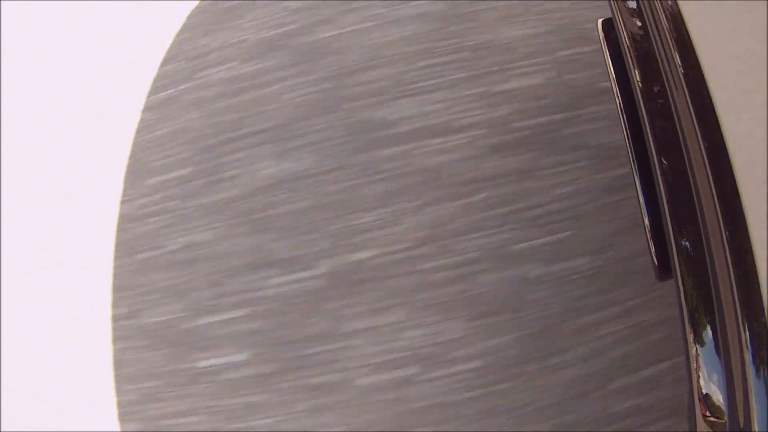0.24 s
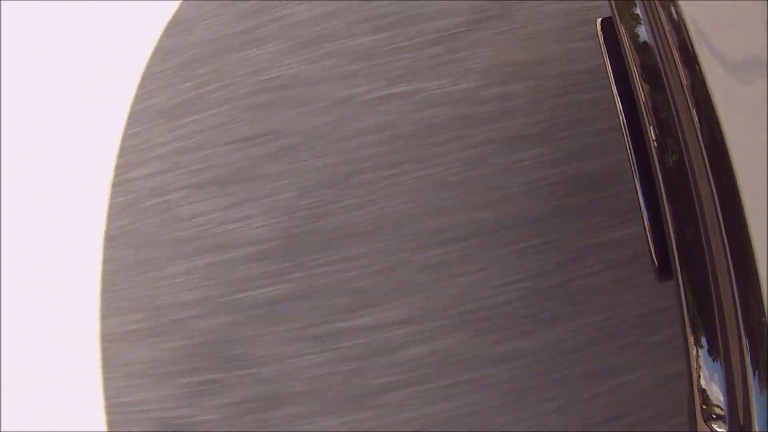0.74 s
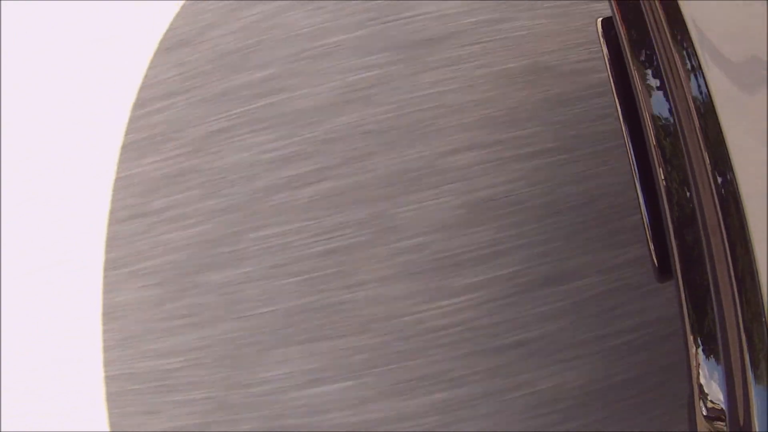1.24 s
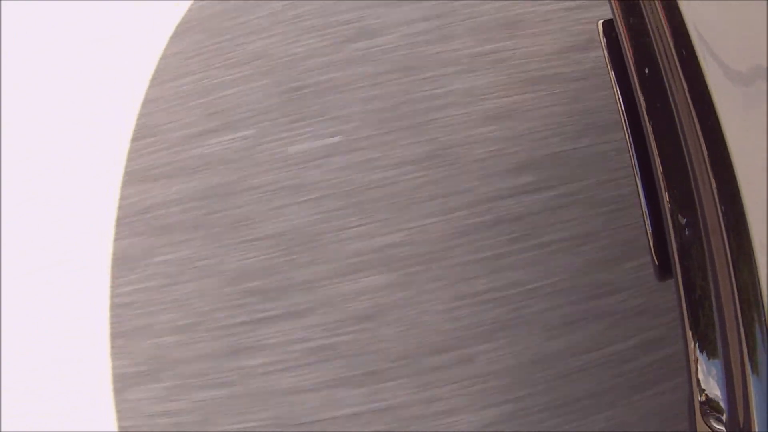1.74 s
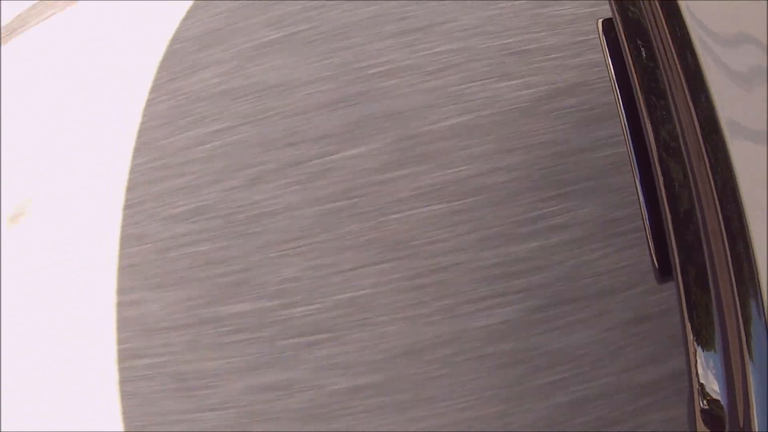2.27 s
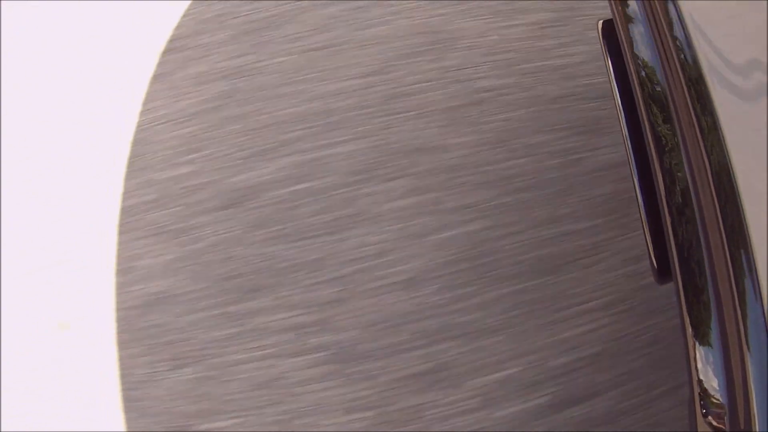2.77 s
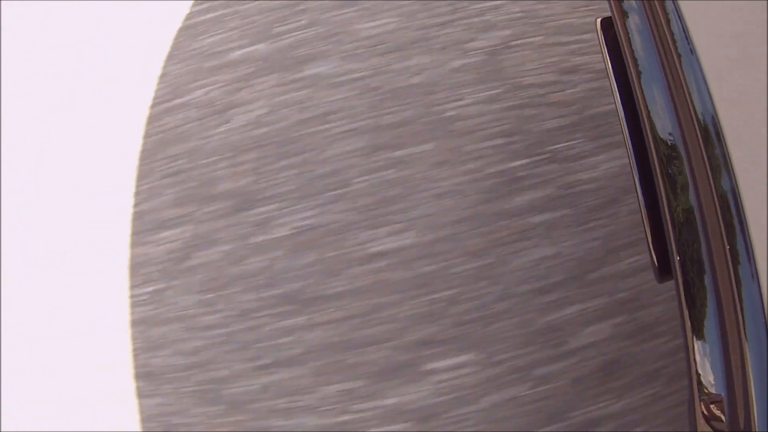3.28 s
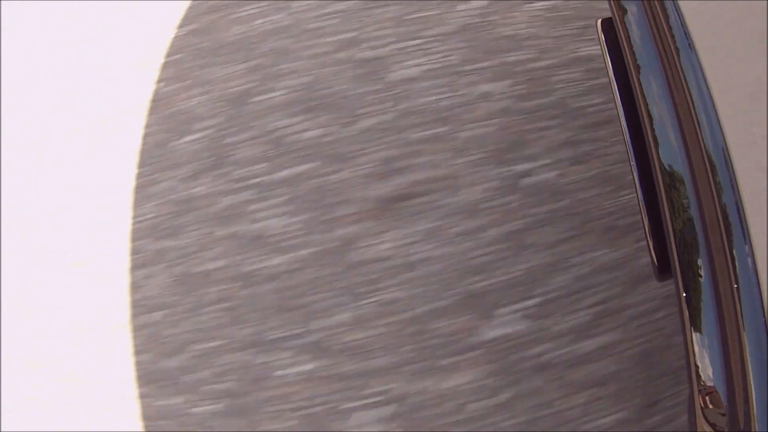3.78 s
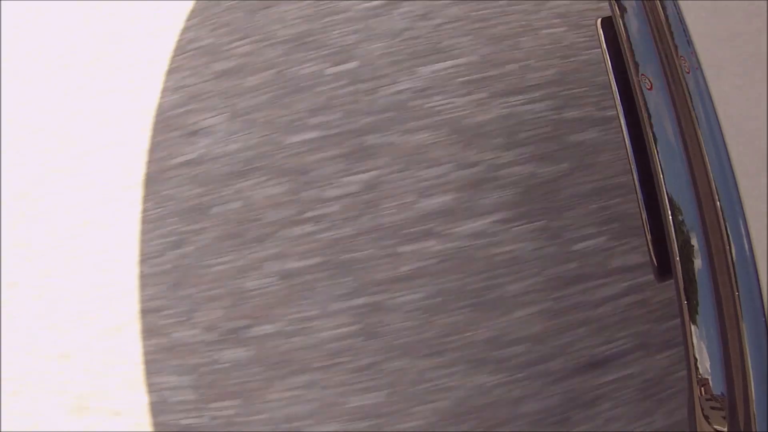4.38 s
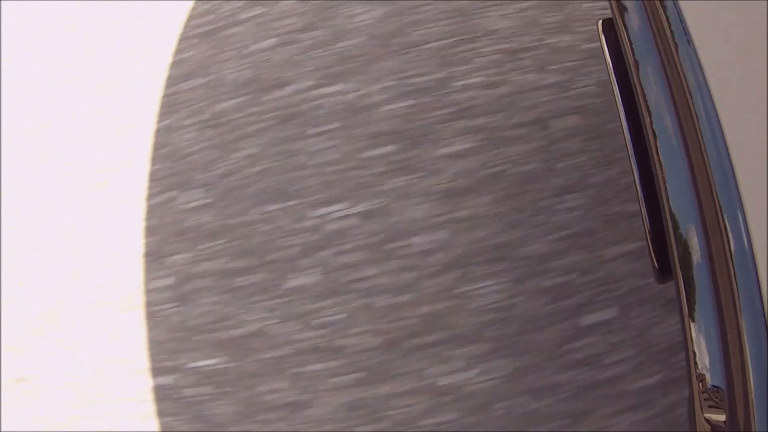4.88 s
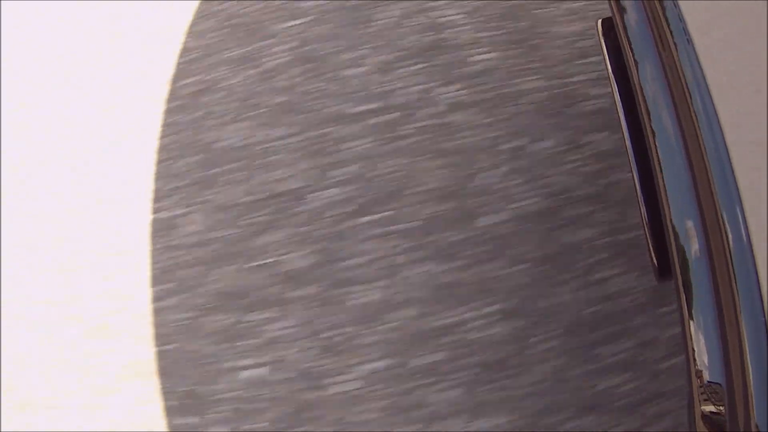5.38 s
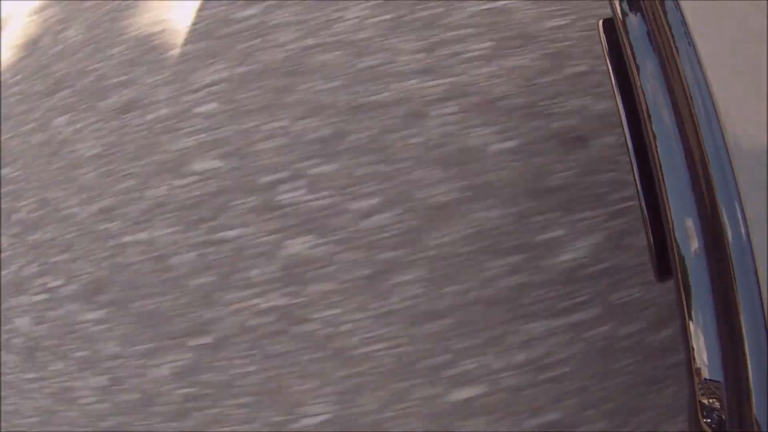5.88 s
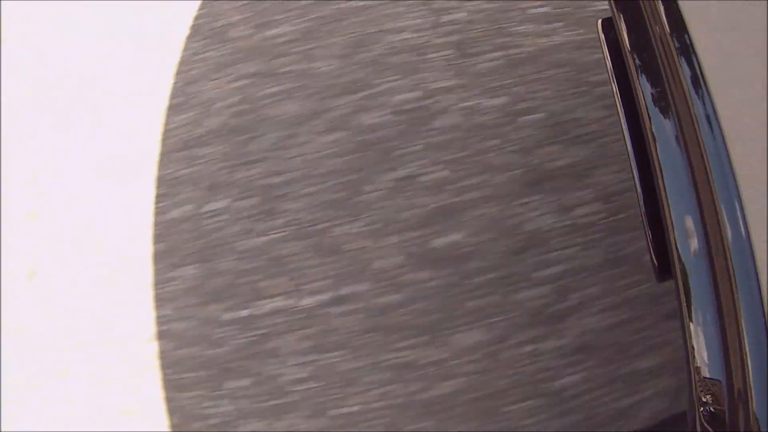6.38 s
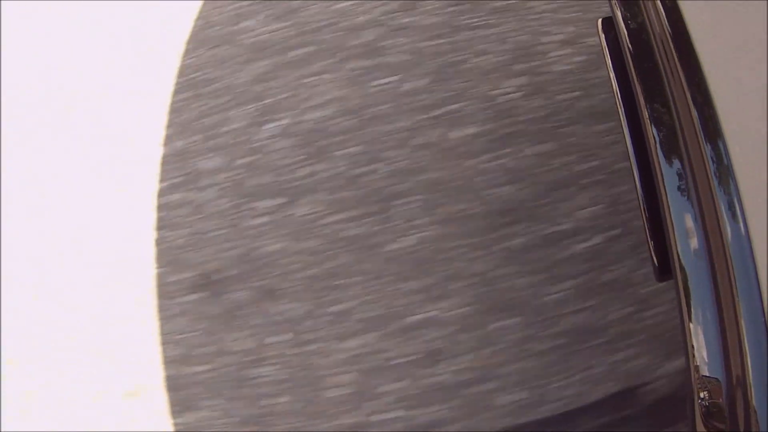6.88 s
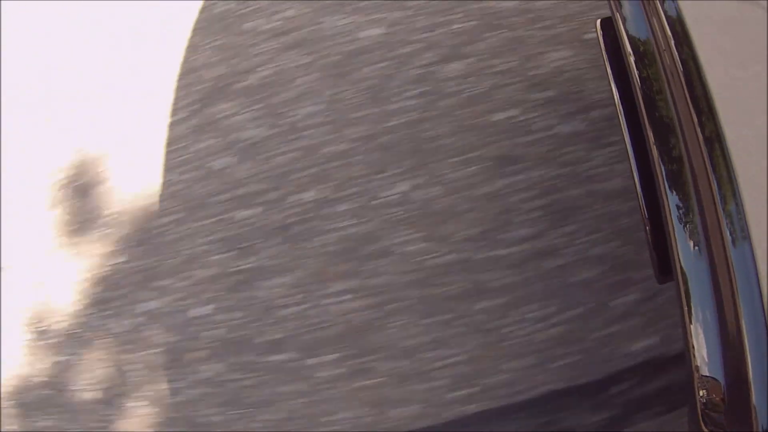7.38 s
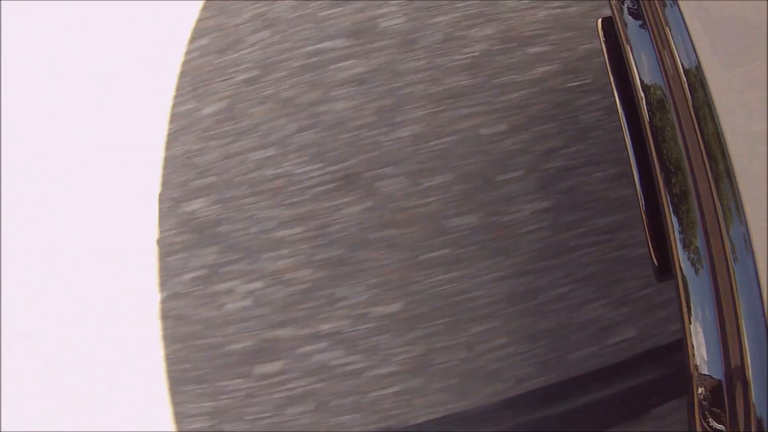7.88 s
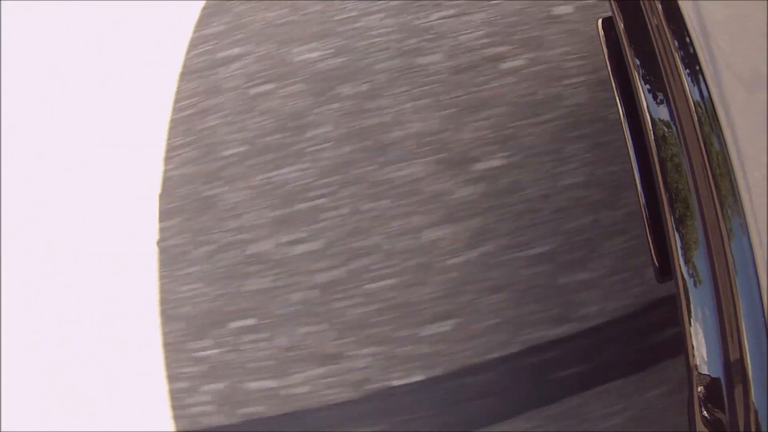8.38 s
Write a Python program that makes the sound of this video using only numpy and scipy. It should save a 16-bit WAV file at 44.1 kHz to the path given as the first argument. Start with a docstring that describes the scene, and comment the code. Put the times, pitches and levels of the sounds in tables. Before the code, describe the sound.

Close at a driving car's tailpipe: throaty warbling engine pull, crackling coast, quick downshift rev, sharp bangs, then a slowly falling coarse growl.

```python
"""Five-cylinder turbo exhaust

A boxed microphone on the rear bumper hears the engine pull, burble, coast, blip, backfire and slow down.
Firing pulses and gated gas noise ring the open tailpipe, over clean firing tones and a low lope.
Filtered noise and gliding sines make the turbo; impulses and noise bursts make the bangs and treble ticks.
The loudest peaks overload and flatten at full scale."""
import sys
import numpy as np
from scipy import signal
from scipy.fft import irfft
from scipy.io import wavfile
from scipy.ndimage import uniform_filter1d

SR = 44100
rng = np.random.default_rng(int(sys.argv[2]) if len(sys.argv) > 2 else 0)


def persist_wave(psi):
    """Save psi, clipped to +-1, as 16-bit WAV."""
    counts = np.round(np.clip(psi, -1, 1) * 32767).astype(np.int16)
    wavfile.write(sys.argv[1], SR, np.atleast_2d(counts).T)


N = 380583
HZ = np.fft.rfftfreq(8192, 1 / SR)  # frequency grid of the filters


def amp(db):
    """Decibel law: converts a level to an amplitude gain."""
    return 10 ** (np.asarray(db) / 20)


def evened(x):
    """Power normalisation: scales the whole signal to rms 1."""
    return x / np.sqrt(np.mean(x ** 2) + 1e-20)


def steady(x, span=SR // 4):
    """Running power normalisation: brings the moving rms to 1."""
    return x / np.sqrt(abs(uniform_filter1d(x ** 2, size=span)) + 1e-20)


def drift(span):
    """Low-pass random process: noise averaged twice over span samples, at rms 1."""
    once = uniform_filter1d(rng.standard_normal(N), size=span)
    return evened(uniform_filter1d(once, size=span))


def decaying(x, decay_s):
    """Exponential relaxation: each impulse dies away with time constant decay_s."""
    return signal.lfilter([1], [1, -np.exp(-1 / (decay_s * SR))], x)


def along(table):
    """Linear interpolation in time: each column of a table as a curve over all samples."""
    s, *columns = np.transpose(table)
    return [np.interp(np.arange(N) / SR, s, c) for c in columns]


def read(points, hz):
    """Spectral interpolation: straight lines on a log-frequency axis."""
    f, value = np.transpose(points)
    return np.interp(np.log(hz + 1), np.log(f + 1), value)


def joined(db, gain):
    """Power addition: level in dB of two unrelated sounds together."""
    return 10 * np.log10(amp(db) ** 2 + gain ** 2)


def modes(table, top_hz):
    """Modal summation: gain of steep resonances in power; the box shuts out what lies above top_hz."""
    rings = sum(amp(2 * db) / (1 + (2 * (HZ - hz) / width) ** 2) ** 1.488 for hz, width, db in table)
    return np.sqrt(rings / (1 + (HZ / top_hz) ** 16))


def lifts(table):
    """Resonant equalisation: gain over HZ of peaks or dips."""
    return amp(sum(db / (1 + (2 * (HZ - hz) / width) ** 2) for hz, width, db in table))


def colour(x, gain):
    """Minimum-phase filtering: a causal filter shaped as gain; a click comes out with peak 1."""
    log = np.log(np.maximum(gain / gain.max(), 1e-5))
    mirrored = np.concatenate([log, log[-2:0:-1]])
    phase = -signal.hilbert(mirrored).imag[:len(log)]
    taps = irfft(np.exp(log + 1j * phase))[:4096]
    return signal.oaconvolve(np.ravel(x), taps / abs(taps).max())[:N].reshape(np.shape(x))


def resonate(x, hz, width):
    """Heterodyne resonance along the curve hz: filtered both ways, it swells as slowly as it dies."""
    turn = np.exp(2j * np.pi * np.cumsum(hz) / SR)
    r = np.exp(-np.pi * width / SR)
    return (turn * signal.filtfilt([1 - r], [1, -r], x / turn)).real


# round trips in the tailpipe: delay_s, level_db
PIPE_ECHOES = [(.0072, -16.5), (.0145, -19.5)]


def echoed(x):
    """Pipe reflection: each pulse runs up the pipe and back."""
    return x + sum(amp(db) * np.roll(x, round(s * SR)) for s, db in PIPE_ECHOES)


# what the driver does, each row until the next; the engine's resonances then shape the levels:
# start_s, firing_tone_db, pipe_boom_db, lope_db, upper_tones_db, load (0-1)
PHASES = [(0, -30.5, -55, -26.5, -34.5, 0.27), (0.152, -27.5, -33, -27.5, -32, 1),
          (1.38, -29, -44, -24, -40.5, 0.45), (2.58, -34.5, -32, -29, -48, 0),
          (3.144, -23, -28, -27.5, -33, 0.5), (3.678, -28, -40, -27.5, -28, 0.57),
          (4.289, -34.5, -28.5, -29, -32, 0.6), (4.617, -48.5, -47, -24.5, -55, 0.4),
          (5.192, -38, -58, -20, -31.5, 0.3), (5.951, -37, -44, -16.5, -35, 0.1),
          (7.447, -19.5, -21, -25, -35, 0.16)]
# loose burns in each phase: share (0-1)
MISFIRE = [.1, .06, .62, .35, .04, .11, .04, .62, .15, .2, .06]
FUEL_CUT_S = PHASES[7][0]
CHANGE_S = 0.0075  # from one phase to the next


def phases():
    """Smoothed step control: each phase column and the misfire share, with soft edges."""
    start, *columns = np.transpose(PHASES)
    now = np.maximum(np.searchsorted(start, np.arange(N) / SR, "right") - 1, 0)
    steps = [c[now] for c in (*columns, np.array(MISFIRE))]
    return [uniform_filter1d(step, size=round(CHANGE_S * SR), mode="nearest") for step in steps]


# clusters of late burns that shake the silencer, before its resonance acts: start_s, length_s, lope_db
BURBLES = [(1.436, 0.26, -11), (1.952, 0.037, -7), (2.025, 0.11, -21.5), (2.287, 0.26, -11.5),
           (2.59, .53, -11.5), (3.669, 0.062, -17.5), (3.832, 0.1, -23), (4.089, 0.095, -22),
           (4.268, 0.024, -26), (4.634, 0.05, -15), (5.137, 0.023, -17)]
BURBLE_EDGE_S = .022  # rise and fall


def burbles():
    """Trapezoidal envelope: the gain of the burbles rises, holds and falls."""
    t = np.arange(N) / SR
    total = 0
    for s, length, db in BURBLES:
        inside = np.minimum(t - s, s + length - t)
        total = total + amp(db) * np.clip(inside / BURBLE_EDGE_S + .5, 0, 1)
    return total


# each cylinder's pulse at the tailpipe, strength before a lopsided engine widens it:
# strength_db, manifold_delay_s
CYLINDERS = [(0, 0), (-2.5, .00029), (-1.5, .00086), (-3, .00029), (-2, 0)]
WANDER_S, LATE_S = .00016, .00077  # slow timing drift of each cylinder; scatter of fully loose burns


def firings(turns, misfire, lopsided):
    """Cyclic combustion: five pulses a cycle, of cylinder strength and chance strength, and charge noise."""
    fired = np.flatnonzero(np.diff((5 * turns).astype(int)))[:-1]
    count = np.arange(len(fired))
    cylinder_db, delay = np.transpose(CYLINDERS)[:, (count + 1) % 5]
    strength, charge, scatter = rng.standard_normal((len(fired), 3)).T
    loose = misfire[fired]
    # each cylinder reads its own stretch of one drift
    wander = WANDER_S * (2 + drift(5000)[(fired + count % 5 * (N // 5)) % N])
    late = delay + wander + LATE_S * loose * scatter
    pulse_db = (1 + 1.6 * lopsided[fired]) * cylinder_db + (.7 + 7 * loose) * np.minimum(strength, .8)
    pulses, uneven = np.zeros((2, N))
    pulses[fired + np.round(late * SR).astype(int)] = amp(pulse_db)
    uneven[fired] = np.tanh(2 * charge)  # a charge burns or does not
    return pulses, uneven


# relative ring of tailpipe and microphone box: pitch_hz, width_hz, level_db
PIPE_RINGS = [(275, 130, -5.5), (329.7, 15, 8), (447, 69, -4), (528, 190, -11), (659.3, 86, 6.5),
              (808, 23, 2.5), (851, 69, -6.5)]
PIPE_HZ, PIPE_WIDTH_HZ, BOOM_LIFT_DB = 337, 6.7, 9  # the boom swells as it nears the pipe resonance
UPPER_FLOOR_DB = -26.5  # upper tones between the rings


def drone(hz, turns, tone_db, boom_db, upper_db):
    """Harmonic series of five like pulses a cycle: clean tones, with the pipe boom on the third."""
    boom_db = boom_db + BOOM_LIFT_DB / (1 + ((15 * hz - PIPE_HZ) / PIPE_WIDTH_HZ) ** 2)
    # the second tone swells as it crosses the pipe resonance
    passing_db = 9 / (1 + ((10 * hz - PIPE_HZ) / 24) ** 2)
    rings_db = 20 * np.log10(modes(PIPE_RINGS, top_hz=1500) + amp(UPPER_FLOOR_DB))
    upper = [upper_db + np.interp(5 * k * hz, HZ, rings_db) for k in range(4, 9)]
    out = 0
    for k, db in enumerate([tone_db, tone_db - 11.0 + passing_db, boom_db] + upper, start=1):
        out = out + np.sqrt(2) * amp(db + 2.2 * drift(2000)) * np.sin(2 * np.pi * 5 * k * turns)
    return out


# unequal cylinders sound between the firing orders, relative levels: multiple_of_cycle, level_db
LOPE_ORDERS = [(1, -20), (2, -7), (3, -10), (4, -19), (6, -22.5), (8, -23.5)]


def lope(turns, uneven, misfire):
    """Subharmonic orders of unequal cylinders; misfires turn them into loose booms in the silencer."""
    tones = 0
    for k, db in LOPE_ORDERS:
        angle = 2 * np.pi * k * (turns - .12) + .3 * k ** 2
        tones = tones - amp(db + 0.31 * drift(3000)) * np.cos(angle)
    booms = colour(uneven, modes([(47.5, 78, -8.0), (82, 380, -18.0)], top_hz=403))
    return np.sqrt(1 - misfire ** 2) * evened(tones) + misfire * steady(booms, span=SR // 16)


# the main ring wanders as the gas heats and cools: time_s, pitch_hz
MAIN_RING = [(0, 693), (1.5, 690), (2.5, 655), (3.8, 670), (4, 745), (4.08, 680), (5.3, 660), (6.1, 700),
             (7.4, 722), (7.6, 670), (8.63, 680)]
MAIN_WIDTH_HZ, MAIN_TAKES = 120, .7  # MAIN_TAKES: share of the sharp rasp that lazy burns replace


def rasp(pulses, misfire, lopsided, boost_db):
    """Impulse excitation of pipe modes: firing pulses and the gas puffs behind them ring the tailpipe."""
    puff = evened(decaying(pulses, 0.009))
    gas = (.13 + misfire) * evened((puff + .3) * rng.standard_normal(N))
    drive = echoed(gas + evened(pulses))
    sharp = steady(colour(drive, modes(PIPE_RINGS, top_hz=1230)))
    # slow lazy burns swell in the main ring alone
    soft = steady(resonate(drive, along(MAIN_RING)[0], MAIN_WIDTH_HZ))
    lazy = lopsided * (1 - 0.63 * misfire) * soft
    return steady((1 - MAIN_TAKES * lopsided) * sharp + lazy + amp(boost_db) * soft)


# relative spectrum of the gas hiss: pitch_hz, density_db per Hz
HISS_SPECTRUM = [(590, 0), (1000, -5), (1070, -8.5), (1180, 0), (1320, -12.5), (1620, -10.5), (1890, -12.5),
                 (2210, -15), (2700, -19.5), (2860, -32), (3050, -21.5), (3160, -27), (3530, -30.5),
                 (4590, -66), (7770, -120)]
# rings in the hiss: pitch_hz, width_hz, loaded_lift_db, shut_throttle_lift_db
HISS_RINGS = [(1134, 11, 9.5, 11.5), (1529, 150, 13, 4.5), (1865, 110, 3, 10), (2038, 210, 6.5, 2.5),
              (2120, 69, 7, 0), (2360, 140, 11.5, -2), (2665, 150, 7, 7), (3460, 110, 14.5, -2.5),
              (2950, 39, 4, 10), (3580, 60, 7, 1)]


def hiss(pulses, spurt, load):
    """Turbulent flow noise: each firing spurts gas, and the hiss spectrum follows the load."""
    flow = (spurt + 5.1) * amp(1.7 * drift(600)) * rng.standard_normal(N)
    spectrum = amp(read(HISS_SPECTRUM, HZ))
    rings = np.array(HISS_RINGS)
    loaded = evened(colour(flow, spectrum * lifts(rings[:, [0, 1, 2]])))
    shut = evened(colour(flow, spectrum * lifts(rings[:, [0, 1, 3]])))
    plain = np.clip(load, 0, 1) * loaded + np.clip(1 - load, 0, 1) * shut
    # the pulse fronts carry above the rasp
    edges = colour(np.sqrt(pulses), modes([(1130, 4000, 0)], top_hz=2600))
    return steady(plain + 0.21 * evened(colour(edges, spectrum)))


# hard gas flow sets these rings fluttering, relative levels: pitch_hz, width_hz, level_db
BUZZ_RINGS = [(3147, 160, 5), (3420, 67, -1)]
BUZZ_DB, BUZZ_SLOPE, BUZZ_FROM_DB = -47, 2.45, -31  # level at a hiss of BUZZ_FROM_DB, dB per dB of hiss
BUZZ_STEADY = .6  # unpulsed part of the jets against the spurts
BOOST_DB = -44  # boost rings at a boost_db of 0


def buzz(spurt, hiss_db, boost_db):
    """Jet-driven resonance: fluttering gas excites narrow rings; high boost wakes two more."""
    flutter = amp(1.8 * drift(400))
    jets = (spurt + BUZZ_STEADY) * flutter * rng.standard_normal(N)
    flow_rings = steady(colour(jets, modes(BUZZ_RINGS, top_hz=3800)))
    boost_rings = steady(colour(jets, modes([(3300, 200, -5), (3710, 130, 0)], top_hz=3950)))
    flow_db = BUZZ_DB + BUZZ_SLOPE * (hiss_db - BUZZ_FROM_DB)
    return amp(flow_db) * flow_rings + amp(BOOST_DB + boost_db) * boost_rings


# engine speed: time_s, cycle_rate_hz
SPEED = [(0, 24.6), (.3, 24.75), (.5, 24.4), (.75, 24.85), (1.2, 25.3), (1.4, 25.25), (2.55, 23.55),
         (2.8, 23.2), (3.17, 22.85), (3.65, 22), (3.7, 22.4), (3.95, 30.1), (4.056, 33.8), (4.18, 35.1),
         (4.25, 35.45), (4.62, 35.15), (4.95, 33), (5.25, 32.8), (6.5, 27.93), (7, 26.22), (7.5, 24.6),
         (8, 22.92), (8.63, 20.8)]
# levels of the two noisy layers, the rasp before burbles add to it: time_s, rasp_db, hiss_db
GAS_LEVELS = [(0, -22.5, -38), (.1, -23.5, -35.5), (.2, -17.5, -31.5), (.4, -16, -30), (1.35, -16, -29),
              (1.45, -14.5, -31), (1.7, -21, -34.5), (1.9, -22, -35.5), (2.4, -19.5, -34),
              (3.15, -24, -36.5), (3.6, -14.5, -35), (3.7, -19.5, -36), (3.722, -17.5, -30.5),
              (3.93, -15, -28), (4.14, -16, -31), (4.26, -19.5, -33), (4.31, -23.5, -40), (4.4, -17, -35.5),
              (4.58, -16.5, -34.5), (4.72, -19, -31), (4.78, -30.5, -41.5), (4.92, -29.5, -42),
              (5.12, -25, -37), (5.2, -23, -33.5), (5.8, -22.5, -32), (6.6, -16.5, -29.5),
              (7.25, -20, -28.5), (7.455, -14, -29), (7.49, -15.5, -32.5), (8.63, -16.5, -36)]
# the lope fades as twice the cycle rate leaves the silencer resonance
SILENCER_HZ, SILENCER_WIDTH_HZ = 49.2, 5.66
BURBLE_RASP_DB = -9.5  # rasp against the lope of a burble
SPURT_S = .008  # decay of each gas spurt


def engine():
    """Source-filter principle: one cycle clock drives the tones, lope, rasp, hiss and buzz."""
    hz = along(SPEED)[0]
    turns = np.cumsum(hz) / SR - .1
    rasp_db, hiss_db = along(GAS_LEVELS)
    tone_db, boom_db, lope_db, upper_db, load, misfire = phases()
    boost_db = 1.3 * (along(TURBO_RUSH)[0] + 54)  # 0 dB at a rush of -54 dB

    burble = burbles()
    # near 1 burbles drive the silencer resonance; near 0 they only thump it
    near = 1 / (1 + ((2 * hz - SILENCER_HZ) / 12) ** 4)
    detuned = (2 * hz - SILENCER_HZ) / SILENCER_WIDTH_HZ
    lope_db = joined(lope_db - 10 * np.log10(1 + detuned ** 2), burble * amp(-10 * near))
    rasp_db = joined(rasp_db, burble * amp(BURBLE_RASP_DB))
    booming = np.clip(np.maximum(misfire, (1 - near) * burble / amp(lope_db)), 0, 1)

    lopsided = np.clip((lope_db - tone_db) / 15, 0, 1)  # a strong lope means one cylinder leads
    pulses, uneven = firings(turns, misfire, lopsided)
    spurt = steady(decaying(pulses ** 2, SPURT_S))  # the strongest firings spit most

    out = drone(hz, turns, tone_db, boom_db, upper_db)
    out = out + amp(lope_db) * lope(turns, uneven, booming)
    # burbles drive the silencer at twice the cycle rate
    out -= amp(-2.5) * near * burble * np.cos(4 * np.pi * (turns - .12) + 2.0)
    out += amp(rasp_db) * rasp(pulses, misfire, lopsided, boost_db)
    out += amp(hiss_db) * hiss(pulses, spurt, load)
    return out + buzz(spurt, hiss_db, boost_db)


# relative spectrum of rushing air: pitch_hz, density_db per Hz
AIR_SPECTRUM = [(3300, -24.5), (4000, -2), (4500, 1), (5500, -1.5), (6800, -6), (8000, -17), (11000, -31),
                (15000, -46)]
# rings in the rush: pitch_hz, width_hz, lift_db
AIR_RINGS = [(4470, 110, 6.5), (4900, 69, 2)]
# level of the rush: time_s, rush_db
TURBO_RUSH = [(0, -67.5), (0.18, -67), (0.6, -64.5), (1.35, -61.5), (1.7, -71.5), (2.42, -63),
              (2.72, -71.5), (3.55, -70), (3.66, -63.5), (3.8, -60.5), (3.95, -56), (4.1, -56.5),
              (4.26, -67), (4.92, -73.5), (6.4, -64), (7.41, -66), (7.55, -67.5), (8.6, -67.5)]
# faint whistles: start_s, end_s, start_hz, end_hz, level_db
WHISTLES = [(1.3, 2.898, 5770, 5020, -71), (5.65, 7.5, 8250, 6600, -85.5), (6.7, 8.6, 4520, 4460, -69),
            (.2, 1.8, 4900, 4520, -70)]


def turbo():
    """Broadband flow noise with tonal whistles: a smooth rush of air and thin wavering glides."""
    air = colour(rng.standard_normal(N), amp(read(AIR_SPECTRUM, HZ)) * lifts(AIR_RINGS))
    out = amp(along(TURBO_RUSH)[0] + 1.0 * drift(900)) * evened(air)
    t = np.arange(N) / SR
    for start, end, hz, end_hz, db in WHISTLES:
        glide = np.interp(t, [start, end], [hz, end_hz]) + .007 * hz * drift(300)
        fade = np.clip(np.minimum(t - start, end - t) / .2, 0, 1)
        out += fade * amp(db + 3 * drift(1500)) * np.sin(2 * np.pi * np.cumsum(glide) / SR)
    return out


# backfires in the pipe, impulse levels before the mix gains: start_s, impulse_db, crack_db
BANGS = [(.145, -10, -56), (1.486, -9, -28), (1.585, -1, -40), (1.744, -7.5, -60), (2.249, -1.5, -63),
         (2.327, -8, -44), (2.374, -6, -49), (2.657, -3.5, -40), (2.71, -9, -42), (2.743, -5.5, -44.5),
         (2.899, -14, -45), (2.933, -11, -36), (3.073, -24, -39), (3.117, -6.5, -37), (3.709, -4.5, -42),
         (3.769, -1, -30), (3.92, -4, -32), (4.005, -29, -38), (4.06, -2, -31), (4.114, -6, -22),
         (4.195, -6, -31), (4.7536, 0, -9), (4.828, 0.5, -13.5), (4.847, -15, -34), (4.871, -23, -45),
         (4.9599, -1, -10.5), (5.0678, -3, -16), (5.134, -9.5, -31)]
# relative spectrum of the crack: pitch_hz, density_db per Hz
CRACK_SPECTRUM = [(590, -16.5), (1000, -6.5), (1170, -8.5), (1490, -14.5), (1770, -10), (2230, -25),
                  (2750, -33.5), (3080, -30), (3530, -37), (4590, -84), (7770, -120)]


def bangs():
    """Impulse response of the tailpipe: a sudden pressure pulse rings it, with a short crack on top."""
    s, impulse_db, crack_db = np.transpose(BANGS)
    at = np.round(s * SR).astype(int)
    hard = s > FUEL_CUT_S  # then the bangs slam the pipe; earlier pops let it ring on
    ring, pop, crack = np.zeros((3, N))
    ring[at] = -amp(impulse_db) * hard
    pop[at] = -amp(impulse_db) * ~hard
    crack[at] = amp(crack_db)
    pop = colour(pop, modes([(676, 26, 8), (800, 120, -3)], top_hz=940))
    ring = colour(ring, modes([(643, 170, 3.5), (805, 110, 1.0), (285, 490, -5.0)], top_hz=1004))
    burst = decaying(crack, 0.0013) * rng.standard_normal(N)
    puff = decaying(crack, 0.0039) * rng.standard_normal(N)  # hot gas jets out
    out = echoed(amp(4.0) * ring) + amp(-2.0) * pop
    out += amp(-39.0) * colour(puff, amp(read(AIR_SPECTRUM, HZ)))
    return out + amp(-2.5) * colour(burst, amp(read(CRACK_SPECTRUM, HZ)))


# faint dry ticks, level before the noise and filter: start_s, level_db
TICKS = [(2.576, -53), (2.732, -55), (2.8967, -63), (3.027, -56), (3.0694, -56), (3.7712, -50),
         (3.9185, -51), (3.9413, -56), (4.114, -54)]


def ticks():
    """Transient noise bursts: sub-millisecond decays of noise, treble only."""
    s, db = np.transpose(TICKS)
    spit = np.zeros(N)
    spit[np.round(s * SR).astype(int)] = amp(db)
    spit = decaying(spit, 0.00042) * rng.standard_normal(N)
    treble = modes([(7000, 7000, 0)], top_hz=10500) / (1 + (3800 / (HZ + 1)) ** 4)
    return colour(spit, treble)


def scene():
    """Linear superposition: exhaust, turbo, backfires and ticks add at one microphone."""
    return (engine() + turbo() + bangs() + ticks())[None]


# the microphone box swallows these: pitch_hz, width_hz, lift_db
BOX_DIPS = [(1055, 64, -8), (1457, 21, -8.5), (1580, 190, -6.5), (1800, 170, -7)]
EDGE_HZ = 15000  # upper band limit


def record(dry):
    """Saturation and band limiting: box dips, overload that flattens at full scale, then a low-pass."""
    boxed = colour(dry, lifts(BOX_DIPS))
    clipped = boxed / (1 + abs(boxed) ** 30) ** (1 / 30)
    clipped = clipped * np.minimum(np.arange(N)[::-1] / 90, 1)  # 2 ms fade at the end
    low_pass = signal.firwin(511, EDGE_HZ, window=("kaiser", 9), fs=SR)
    return signal.oaconvolve(clipped, low_pass[None], "same")


dry = scene()
out = record(dry)
persist_wave(out)
```